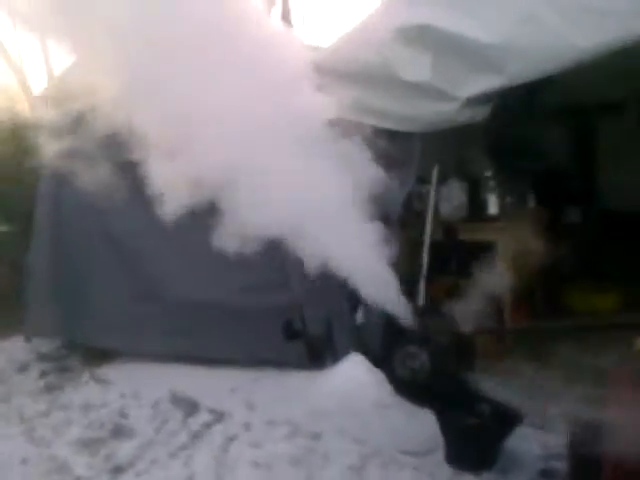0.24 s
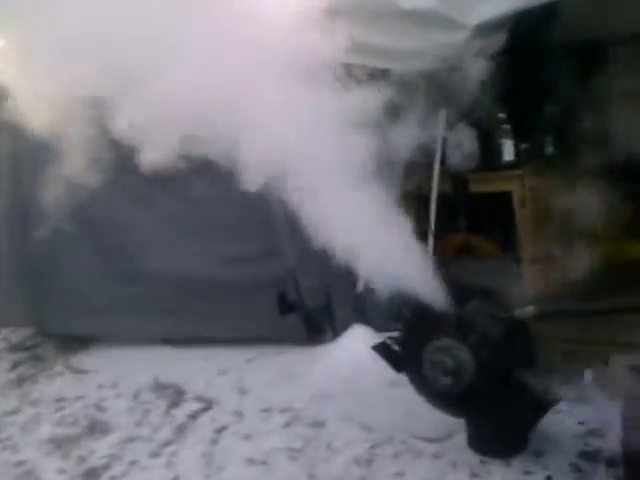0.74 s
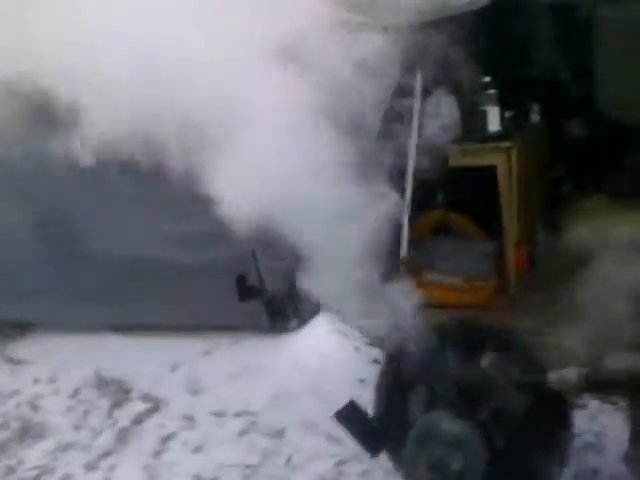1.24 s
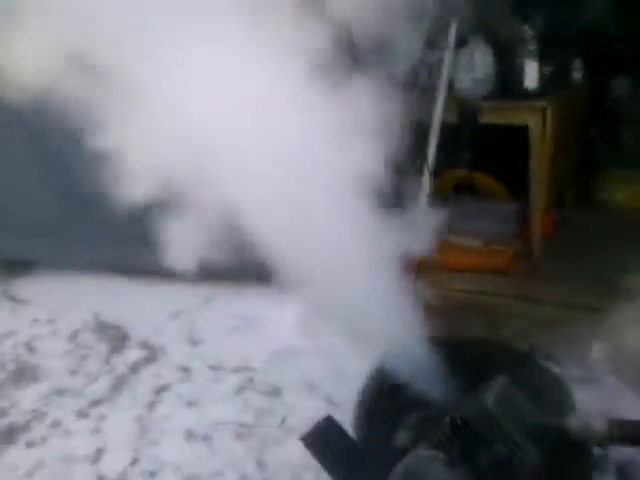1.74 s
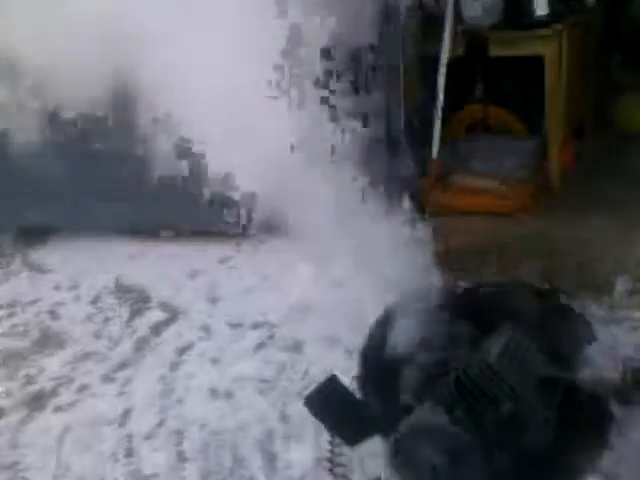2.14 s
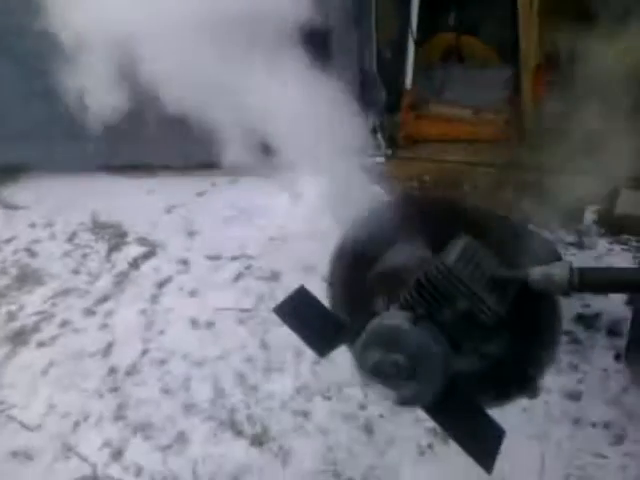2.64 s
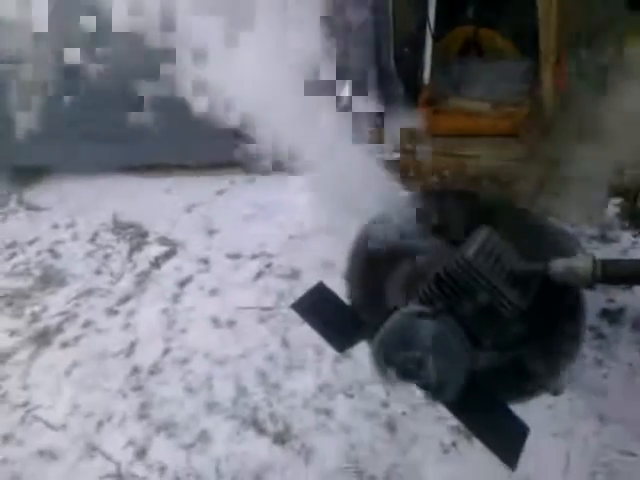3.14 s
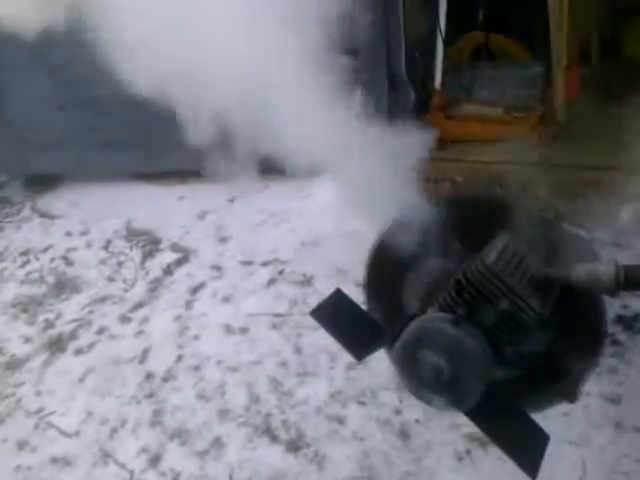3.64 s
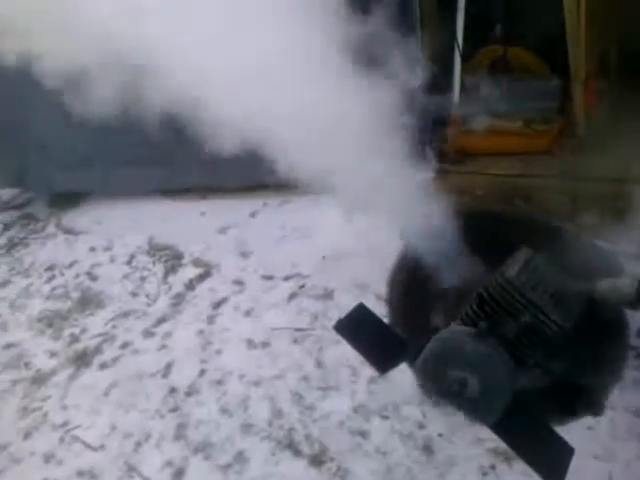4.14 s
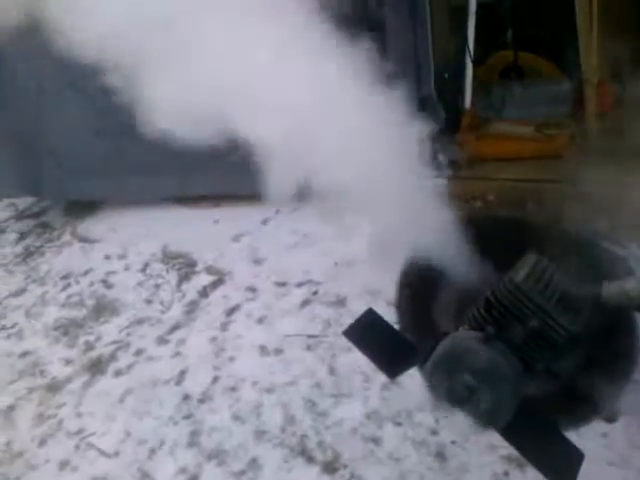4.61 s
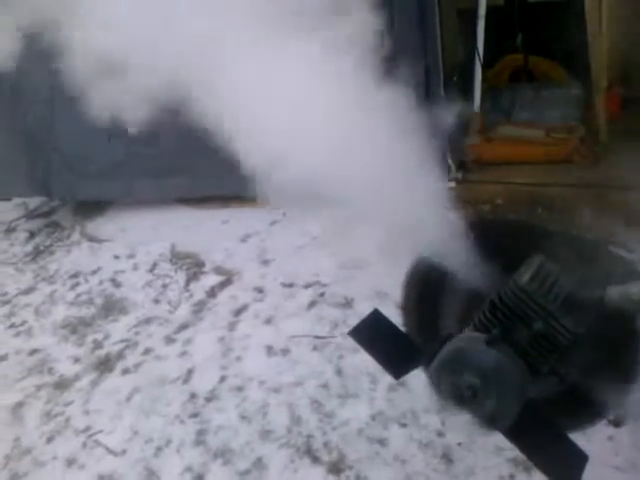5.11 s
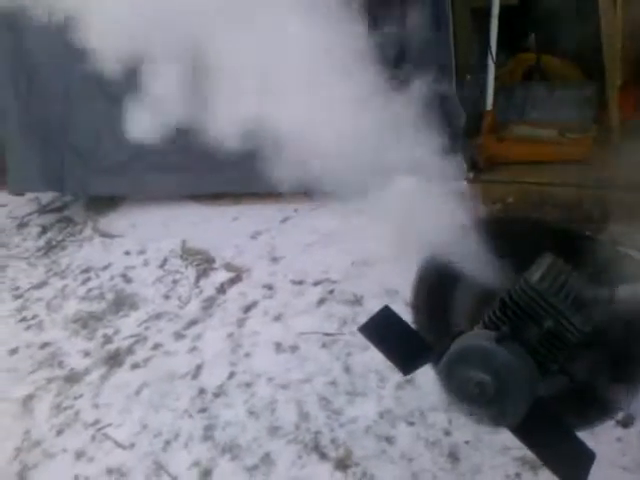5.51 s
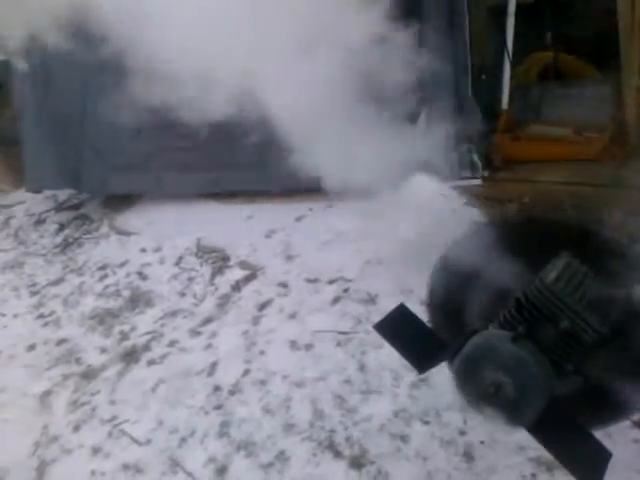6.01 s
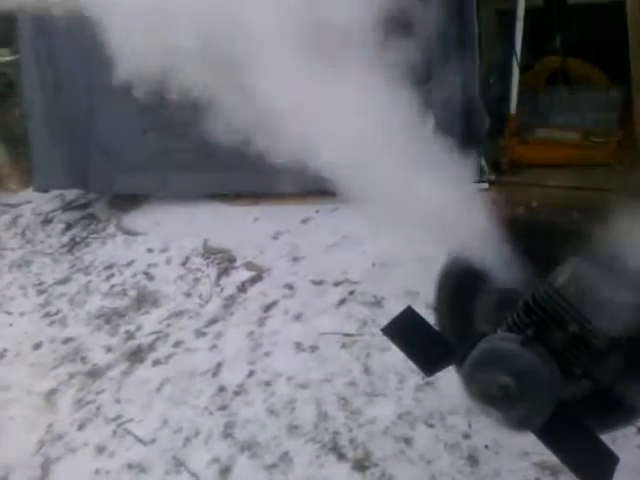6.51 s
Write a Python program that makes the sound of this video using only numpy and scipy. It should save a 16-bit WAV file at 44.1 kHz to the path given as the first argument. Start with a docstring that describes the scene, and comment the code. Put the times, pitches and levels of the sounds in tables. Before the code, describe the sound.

A thin steam hiss is joined at once by quick, even chuffing, which speeds up slightly and then holds. Each short noisy puff opens with a thump, fizzes and is chopped shut. Carried toward the engine, the microphone catches a brief swell at the jet, then weaker knocks and a softer, hollow hiss. The sound is dry and close, with slight yard reflections, and stops suddenly.

```python
"""A thin hiss of leaking steam, joined at once by the quick puffs of a small one-cylinder steam engine in a snowy yard.
It speeds up to about eleven turns a second. Each turn the exhaust port opens with a thump (a pressure pulse
ringing low modes), blows a burst of hiss (shaped noise in three bands) and knocks shut.
The microphone is carried up to the engine and past the jet: the hiss changes colour and the knocks sink.
A close bounce, scatter and a wall echo add the yard; one dull bump comes late; then the sound cuts off."""
import sys
import numpy as np
from scipy import signal
from scipy.io import wavfile
from scipy.ndimage import uniform_filter1d, map_coordinates

SR = 44100
rng = np.random.default_rng(int(sys.argv[2]) if len(sys.argv) > 2 else 0)


def store_pcm(level_fs):
    """Save levels as 16-bit WAV."""
    pcm = np.round(np.clip(level_fs, -1, 1) * 32767).astype(np.int16)
    wavfile.write(sys.argv[1], SR, np.atleast_2d(pcm).T)


N = 298116
STOP_S, EDGE_HZ = 6.286, 15850
TIME = np.arange(N) / SR
FFT_SIZE, HOP = 1024, 256
FRAME_S = np.arange(N // HOP + 5)[:, None] * HOP / SR
BIN_HZ = np.fft.rfftfreq(FFT_SIZE, 1 / SR)


def gain_of(db):
    """Decibels to amplitude."""
    return 10 ** (np.asarray(db) / 20)


def curves(table, t):
    """Every column of a time table, joined by straight lines, at the times t."""
    s, *columns = np.transpose(table)
    return [np.interp(t, s, column) for column in columns]


def read(points, hz):
    """A spectrum, joined by straight lines on a log-frequency axis."""
    f, value = np.transpose(points)
    return np.interp(np.log(hz + 1), np.log(f + 1), value)


def bell(hz, width_hz):
    """A smooth hump over frequency, of height 1; width at half height."""
    return np.exp(-np.log(2) * (2 * (BIN_HZ - hz) / width_hz) ** 2)


def lobes(rows, fade_s=0.44):
    """Gain in dB over time and frequency from bands that fade in and out, half way at start and end."""
    total_db = 0
    for start, end, hz, width_hz, db in rows:
        inside_s = np.minimum(FRAME_S - start, end - FRAME_S)
        presence = np.clip(.5 + inside_s / fade_s, 0, 1)
        total_db = total_db + db * presence * bell(hz, width_hz)
    return total_db


def patches(size):
    """Random blotches over time and frequency, size frames long and about 200 Hz wide, of rms 1."""
    field = rng.standard_normal((len(FRAME_S), len(BIN_HZ)))
    field = uniform_filter1d(field, size=size, axis=0)
    field = uniform_filter1d(field, size=5, axis=1)
    return field / field.std()


def evened(db):
    """Spectra in dB to amplitudes of mean square 1 in each frame."""
    colour = gain_of(db)
    return colour / np.sqrt(np.mean(colour ** 2, axis=-1, keepdims=True))


def noise(colour):
    """Noise whose short-time spectra follow the amplitudes colour; rms 1 if their mean square is 1."""
    z = rng.standard_normal((len(FRAME_S), len(BIN_HZ), 2)) @ [1, 1j]
    x = signal.istft((z * colour).T, nperseg=FFT_SIZE, noverlap=FFT_SIZE - HOP)[1][:N]
    return x * np.sqrt(3 / FFT_SIZE)


def passed(x, hz, kind, order=2):
    """A causal Butterworth filter."""
    return signal.sosfilt(signal.butter(order, hz, kind, fs=SR, output="sos"), x)


def delayed(x, seconds):
    """The sound x, later by a constant or a curve."""
    return map_coordinates(x, [(TIME - seconds) * SR], order=3)


# leak spectrum, relative: (frequency [Hz], density [dB per Hz])
LEAK_SPECTRUM = [(25, -1), (45, 0.5), (110, -8), (250, -0.5), (400, -7.5), (850, -7), (1400, 1), (2600, -1),
                 (3550, -0.5), (4700, 0), (6700, 0.5), (9000, -1), (12000, -11.5), (15500, -18.5)]
# soft whistling bands of the leak: (from [s], to [s], frequency [Hz], width [Hz], gain [dB])
LEAK_WHISTLES = [(-.2, 2.3, 3500, 406, 8), (-.2, 2.6, 6700, 797, 6.5), (-.2, 1.6, 8340, 900, 1),
                 (3.5, 5.5, 1900, 250, 4.5), (5.9, 7.8, 8700, 600, 2)]


def leak(level_db=-37.5, patchy_db=2):
    """Steam escaping from the pipe joints: noise of steady level and slightly restless colour."""
    db = read(LEAK_SPECTRUM, BIN_HZ) + lobes(LEAK_WHISTLES) + patchy_db * patches(size=16)
    return gain_of(level_db) * noise(evened(db))


# the walk to the engine: (time [s], bass gain [dB], treble gain [dB], relative knock level [dB])
WALK = [(0, 4.5, 7.5, -22.5), (1.2, 7.5, 8, -22), (2.3, 4, 4.5, -21), (3.2, 0, 5.5, -29.5),
        (3.7, 5, -1.5, -31.5), (4.4, -0.5, -4, -33), (5.7, 3.5, 0, -34), (6.3, 2, 4, -34)]


def walk(t):
    """Bass, treble and knock levels at the times t, as the microphone moves."""
    return curves(WALK, t)


# loudness of the puffs, relative, greatest as the microphone passes the jet: (time [s], level [dB])
PUFF_LOUDNESS = [(0, -10), (2.0, -9), (2.8, -10.5), (2.97, -6.5), (3.4, -11), (4.1, -13.5), (5.2, -14.5),
                 (5.4, -15.7), (6.3, -16)]


def crank(open_share=0.4, start_hz=9.24256, limit_hz=11.64781, spin_up_s=1.38802,
          sag_hz_per_s=.08234, first_puff_s=.03788, uneven_db=0.02):
    """The flywheel nears a limit that sinks as steam is used up; the port opens for a fixed share of each turn.

    Returns opening times [s], puff levels [dB] and open spans [s]."""
    speed_hz = limit_hz - (limit_hz - start_hz) * np.exp(-TIME / spin_up_s) - sag_hz_per_s * TIME
    turns = np.cumsum(speed_hz) / SR
    first, last = np.interp([first_puff_s, STOP_S], TIME, turns)
    open_s = np.interp(np.arange(first, last), turns, TIME)
    loudness_db, = curves(PUFF_LOUDNESS, open_s)
    puff_db = loudness_db + uneven_db * rng.standard_normal(len(open_s))
    span_s = open_share / np.interp(open_s, TIME, speed_hz)
    return open_s, puff_db, span_s


# each turn: faint knock ahead, port opening, port shutting, rebound:
# (place [share of the open time], width [s], relative level [dB])
KNOCKS = [(-.26, 0.001, -25), (-.022, 0.00069, 3), (.995, 0.00062, -1.5), (1.27, 0.00084, -23)]
# low modes of frame, pipe and cylinder: (frequency [Hz], t60 [s], relative level [dB])
BODY_MODES = [(44, .5, -16), (148.7, 0.026, -10.5), (283, 0.06, -16)]


def thumps(low_hz=75, trim_db=1):
    """Short pressure pulses at fixed places in the turn; each rings the low modes of the body."""
    open_s, _, span_s = crank()
    push = np.zeros(N)
    for share, width_s, db in KNOCKS:
        knock_s = open_s + share * span_s
        midpoints = (knock_s[1:] + knock_s[:-1]) / 2
        nearest = knock_s[np.searchsorted(midpoints, TIME)]
        push -= gain_of(db) * np.exp(-.5 * ((TIME - nearest) / width_s) ** 2)
    t = np.arange(SR // 10) / SR
    ringing = np.zeros(len(t))
    for hz, t60, db in BODY_MODES:
        step = 2 * np.pi * hz / SR
        ringing += gain_of(db - 60 * t / t60) * np.cos(2 * np.pi * hz * t) * step
    push = push + signal.oaconvolve(push, ringing)[:N]
    _, _, knock_db = walk(TIME)
    return passed(push, low_hz, "highpass", order=1) * gain_of(knock_db + trim_db)


# jet spectrum, relative: (frequency [Hz], density [dB per Hz])
JET_SPECTRUM = [(30, -28), (140, -16), (280, -16), (440, -14), (660, -9.5), (1020, -10), (1260, -1),
                (2050, -2), (2600, 1), (5200, 1), (7400, -2), (9500, -7), (12000, -13), (15500, -26.5)]
# standing waves of the exhaust pipe and hollows between: (frequency [Hz], width [Hz], gain [dB])
PIPE = [(284, 62, 4), (710, 140, 1), (910, 98, -4.5), (1300, 250, 0), (2087, 130, -4)]
# hiss bands that stand out or sink at each microphone place: (frequency [Hz], width [Hz], gain [dB])
AFAR = [(365, 99, 6), (4160, 640, 4.5), (4560, 170, -5.5), (5000, 150, -5.5), (5305, 130, 8.5),
        (5760, 221, 6), (6790, 330, -6), (9750, 620, -7.5), (12040, 440, 5), (13000, 700, -2.5)]
APPROACHING = [(932, 214, 13.5), (1380, 230, -4.5), (2240, 200, 3.5), (4510, 720, 4)]
BESIDE_JET = [(2130, 300, 3.5), (3460, 1100, 4.9)]
OVER_ENGINE = [(357, 66, -3), (752, 150, 1.5), (4060, 264, -1.5), (5040, 350, 3.5), (5650, 760, -6)]
LEANING_IN = [(1450, 500, -3), (4730, 280, -2.5), (6970, 1500, 6), (9450, 2500, -1.5)]
DRAWN_BACK = [(3510, 1200, -3.5), (4110, 220, 5.5), (5500, 280, 3), (7130, 200, -7), (9800, 2000, 4.5),
              (14000, 3000, 3)]
# where the microphone is: (from [s], to [s], bands heard there)
PLACES = [(-.2, 2.36, AFAR), (2.4, 3.04, APPROACHING), (2.8, 4.07, BESIDE_JET), (3.15, 7.8, OVER_ENGINE),
          (2.9, 5.35, LEANING_IN), (5.35, 7.56, DRAWN_BACK)]


def jet_colour(bass_hz=600, treble_hz=8500, patchy_db=1.6):
    """Jet spectrum over time: pipe resonances, microphone place and a slowly shifting random patchiness."""
    bass_db, treble_db, _ = walk(FRAME_S)
    heard_bands = [(start, end, *band) for start, end, bands in PLACES for band in bands]
    db = read(JET_SPECTRUM, BIN_HZ) + lobes(heard_bands)
    db = db + sum(gain_db * bell(hz, width_hz) for hz, width_hz, gain_db in PIPE)
    db = db + bass_db / (1 + (BIN_HZ / bass_hz) ** 2)
    db = db + treble_db * (1 - 1 / (1 + (BIN_HZ / treble_hz) ** 4))
    return evened(db + patchy_db * patches(size=12))


# course of one puff: (progress [share of the open time], roar [dB], hiss [dB], fizz [dB]), relative
BLOWDOWN = [(0, 1.5, -0.5, -3.5), (0.099, -8, 0, 4), (0.271, -2, 2.5, 0), (0.499, 1, 0, -3),
            (0.75, -2.5, -3, -4), (.9, -5.5, -5.5, -5), (1, -7, -13.5, -21.5)]


def exhaust(roar_hz=1100, fizz_hz=6500, lead_s=0.00065, rise_s=0.0013, shut_s=0.0036, trim_db=1):
    """Steam blows down through the port: fizz peaks early, roar dips and rebuilds, the closing port chops all."""
    open_s, puff_db, span_s = crank()
    turn = np.maximum(np.searchsorted(open_s - lead_s, TIME) - 1, 0)
    age_s, span_s = TIME - open_s[turn], span_s[turn]
    opening = np.clip((age_s + lead_s) / rise_s, 0, 1)
    closing = np.exp(-np.maximum(age_s - span_s, 0) / shut_s)
    # power shares of the three bands
    roar = 1 / (1 + (BIN_HZ / roar_hz) ** 4)
    fizz = 1 - 1 / (1 + (BIN_HZ / fizz_hz) ** 8)
    shares = [roar, (1 - roar) * (1 - fizz), (1 - roar) * fizz]
    colour = jet_colour()
    steam = np.zeros(N)
    for share, course_db in zip(shares, curves(BLOWDOWN, age_s / span_s)):
        steam += noise(colour * np.sqrt(share)) * gain_of(course_db)
    puffs = steam * opening * closing * gain_of(puff_db[turn] + trim_db)
    # the small jet makes almost no bass of its own
    return passed(puffs, 140, "highpass")


# bounce off the engine's metal as the microphone moves: (time [s], delay [s], level [dB])
BOUNCE = [(0, 0.0016, -16.5), (2.099, .00171, -20), (2.7, 0.0011, -15), (3.7, 0.0016, -26),
          (4.6, 0.00148, -14), (6.298, 0.0015, -25)]
# dying away of the yard: (frequency [Hz], t60 [s])
YARD_DECAY = [(150, 0.17), (1000, 0.14), (4000, 0.074), (12000, 0.06)]


def yard(x, wet_db=-20, first_s=.004, wall_s=.066, wall_hz=11000, echo_under_knock_db=-8.5):
    """Snow swallows most sound: a close bounce, faint shed scatter, a far-wall echo fading with the knocks."""
    bounce_s, bounce_db = curves(BOUNCE, TIME)
    near = x + gain_of(bounce_db) * delayed(x, bounce_s)
    taps = rng.standard_normal(SR // 3) * (np.arange(SR // 3) > first_s * SR)
    hz, t, z = signal.stft(taps, SR, nperseg=256)
    decay = np.exp(-np.log(1000) * t / read(YARD_DECAY, hz)[:, None])
    tail = signal.istft(z * decay, SR, nperseg=256)[1]
    scatter = signal.oaconvolve(x, tail / np.linalg.norm(tail))[:N]
    _, _, knock_db = walk(TIME)
    echo = passed(delayed(x, wall_s), wall_hz, "lowpass")
    return near + gain_of(wet_db) * scatter + gain_of(knock_db + echo_under_knock_db) * echo


def hollow(x, hz=362, width_hz=70, from_s=3.3, fade_s=.6):
    """Over the engine one narrow low-middle band cancels, leaving the puffs hollow."""
    band = passed(x, [hz - width_hz / 2, hz + width_hz / 2], "bandpass", order=1)
    return x - np.clip(.5 + (TIME - from_s) / fade_s, 0, 1) * band


def bump(at_s=5.635, hz=70, fall_s=0.0099, db=-32):
    """One soft, dull bump: a low sine dying away exponentially."""
    age_s = np.maximum(TIME - at_s, 0)
    return gain_of(db) * np.exp(-age_s / fall_s) * np.sin(2 * np.pi * hz * age_s)


def scene():
    """The engine in the yard, in one channel."""
    engine = yard(exhaust() + thumps())
    return hollow(engine + leak() + bump())[None]


def record(dry, ceiling=.8):
    """The recorder rounds off the loudest peaks, stops abruptly, and limits the band."""
    edge = signal.firwin(511, EDGE_HZ, window=("kaiser", 8), fs=SR)[None]
    heard = signal.oaconvolve(dry, edge, "same")
    rounded = heard / (1 + (heard / ceiling) ** 4) ** (1 / 4)
    return signal.oaconvolve(rounded * (TIME < STOP_S), edge, "same")


dry = scene()
out = record(dry)
store_pcm(out)
```